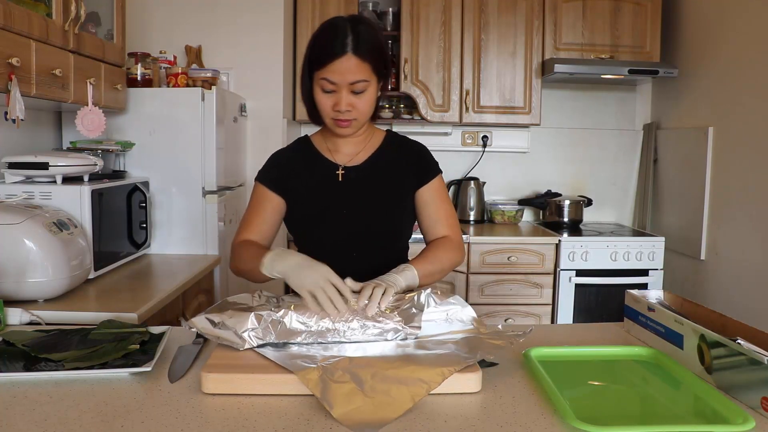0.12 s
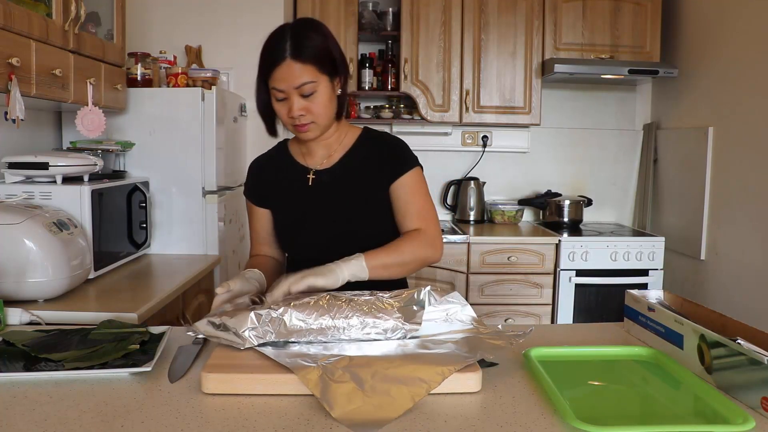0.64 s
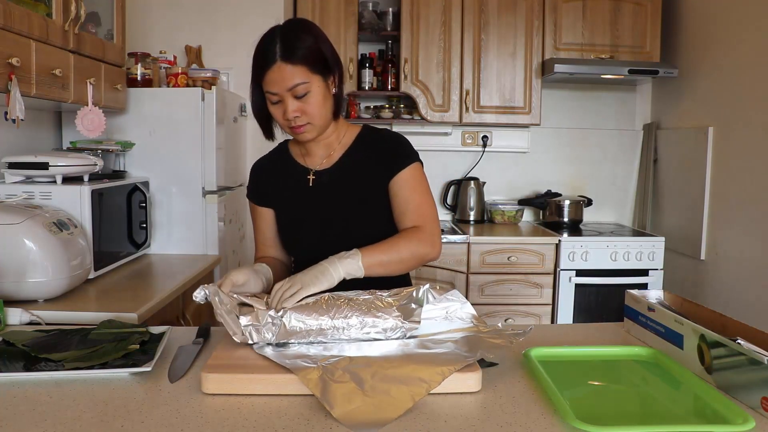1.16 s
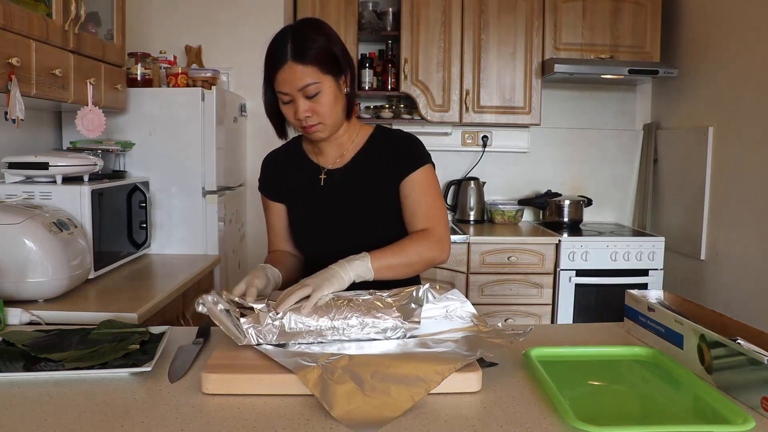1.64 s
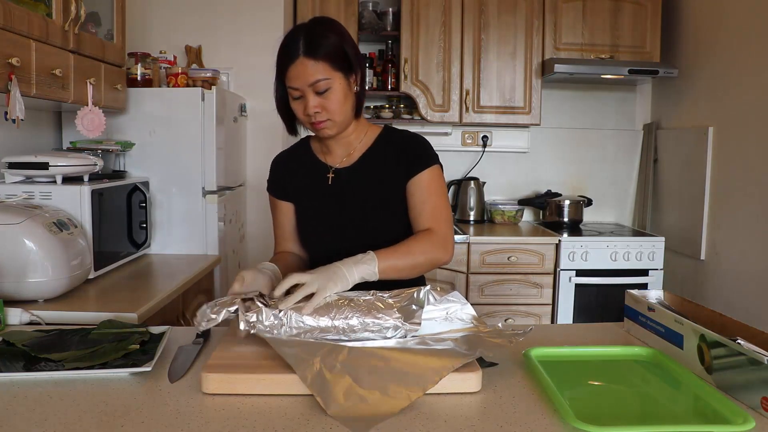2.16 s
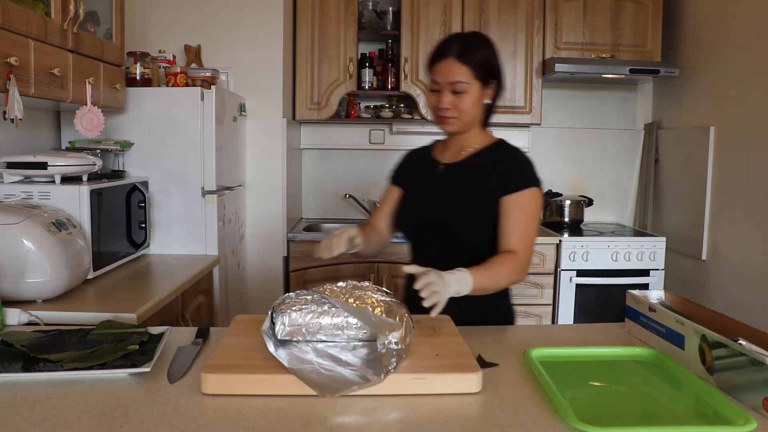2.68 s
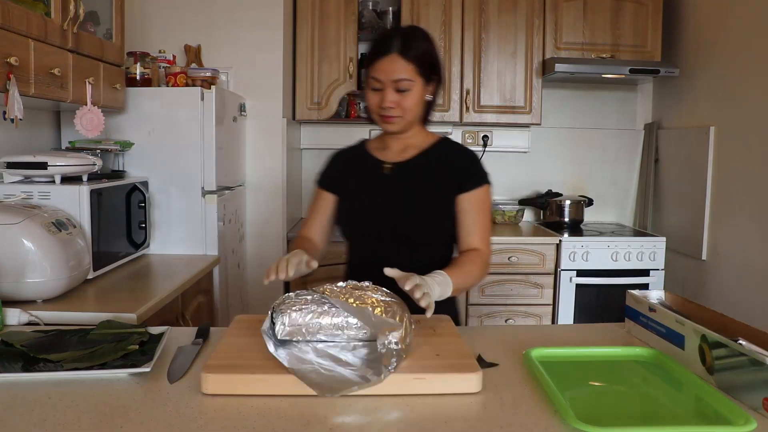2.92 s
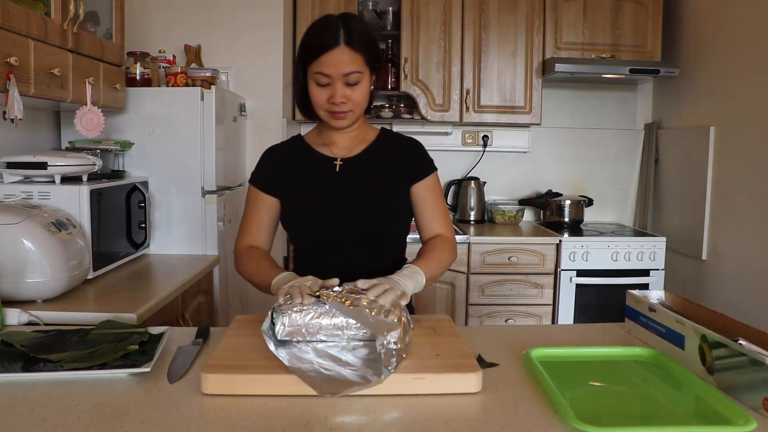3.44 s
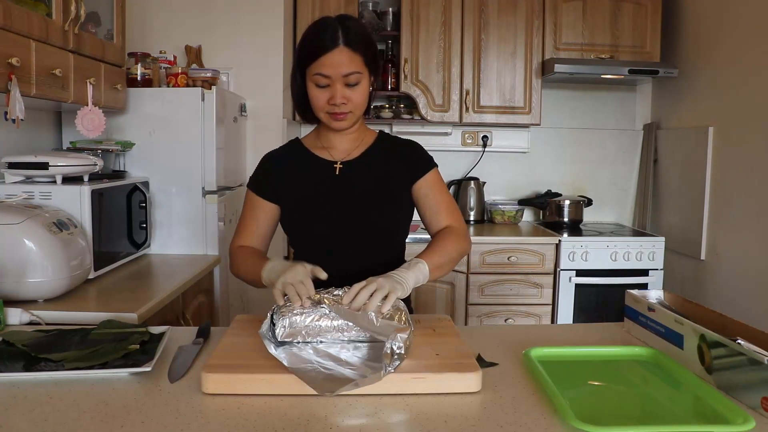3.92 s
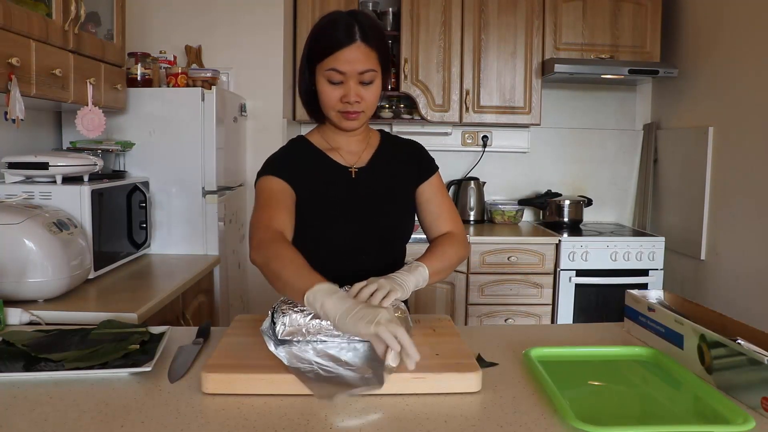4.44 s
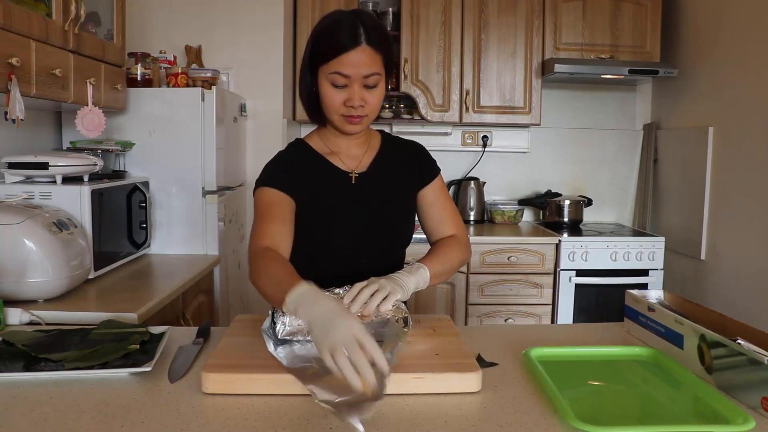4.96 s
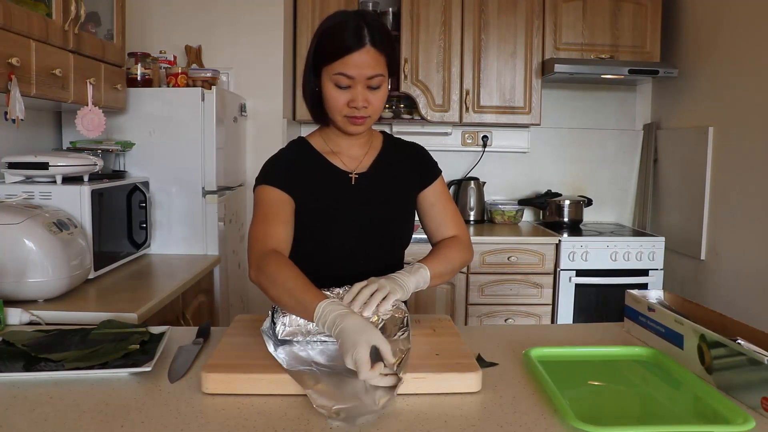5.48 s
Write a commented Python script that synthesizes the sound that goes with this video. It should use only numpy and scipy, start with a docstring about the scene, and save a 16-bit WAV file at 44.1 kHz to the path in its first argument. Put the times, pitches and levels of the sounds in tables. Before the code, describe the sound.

Dense, bright foil crinkling with crunches and sharp ticks, a brief near-quiet gap after an edit, then lighter rustles building to loud crackles.

```python
"""Foil in a hard kitchen

Gloved hands press and fold aluminium foil round a roll on a wooden board in a small hard kitchen.
Creases of four sizes buckle as dense grains of damped sines; stiff folds crunch, sharp ones tick, the board knocks.
The room smears them with decaying noise; a fridge hums over a low drone, hiss and rumble.
An edit joins two moments, cutting the first one's echo short; the second opens with a knock on wood."""
import sys
import numpy as np
from scipy import signal
from scipy.fft import rfft, irfft, next_fast_len
from scipy.io import wavfile
from scipy.ndimage import map_coordinates

SR = 44100
rng = np.random.default_rng(int(sys.argv[2]) if len(sys.argv) > 2 else 0)


def waveform_to_disk(signal):
    """Save audio, clipped to [-1, 1], as 16-bit WAV at the path in sys.argv[1]."""
    frames = np.transpose(np.atleast_2d(signal))
    scaled = np.clip(frames, -1, 1) * 32767
    samples = np.round(scaled).astype(np.int16)
    wavfile.write(sys.argv[1], SR, samples)


def amplitude_ratio(level_db):
    """Convert a level in decibels to the matching linear amplitude (field) ratio."""
    exponent = np.asarray(level_db, float) / 20
    return 10 ** exponent


N = 246502  # length in samples

# Crease sizes, fine to large. Each row: middle pitch in Hz, pitch spread in octaves,
# ring in cycles (it falls to 1/e in half of them), size scatter in dB.
CREASE_SIZES = [(8850, 0.39, 2.3, 2), (3645, 0.53, 1.63, 0), (1505, 0.46, 3.8, 1.5), (483, 0.58, 2.25, 3)]
# How often each crease size buckles. Each entry: pops a second.
CREASE_RATES = [5000, 3000, 1400, 450]
# Balance of the crease sizes. Each entry: level beside the fine creases in dB.
CREASE_BALANCE = [0, 0, -4.5, -11.5]
# Squeezes of the hands. Each row: start in seconds, rise in seconds, hold in seconds,
# level of the fine creases in dB, dB gained per step up in crease size.
SQUEEZES = [(0, 0.0067, 0.054, -27.5, -1), (0.075, 0.054, 0.027, -29, -3),
            (0.227, 0.046, 0.065, -34.5, -0.5), (0.395, 0.054, 0.042, -30, 0),
            (0.64, 0.041, 0.016, -24.5, 1.5), (0.742, 0.06, 0.087, -30.5, 1),
            (0.892, 0.062, 0.046, -28.5, 1), (0.993, 0.056, 0.046, -29, 2),
            (1.124, 0.045, 0.17, -33.5, 1.5), (1.22, 0.069, 0.018, -28, -0.5),
            (1.464, 0.019, 0.012, -29, 1.5), (1.5, 0.022, 0.09, -27, -0.5), (1.617, 0.057, 0.15, -30, 1),
            (1.772, 0.13, 0.1, -28, 1.5), (1.986, 0.055, 0.064, -25, -1.5),
            (2.132, 0.036, 0.079, -31.5, -1), (2.207, 0.06, 0.1, -29, 1.5), (2.352, 0.082, 0.023, -25, 1.5),
            (2.486, 0.026, 0.057, -31, 2), (2.728, 0.016, 0.014, -59, 12.5),
            (2.743, 0.056, 0.021, -50.5, 4), (2.88, 0.052, .12, -63, 3.5), (3.113, 0.082, 0.046, -32, 0.5),
            (3.276, 0.035, 0.064, -41.5, 1), (3.391, 0.031, 0.023, -39.5, 0.5),
            (3.48, 0.056, 0.096, -42.5, -0.5), (3.639, 0.073, 0.036, -38.5, 0),
            (3.732, 0.036, 0.036, -27.5, -1.5), (3.837, 0.038, 0.072, -34.5, -0.5),
            (3.958, 0.025, 0.074, -38, 1), (4.125, 0.033, 0.043, -51, -14),
            (4.241, 0.062, 0.032, -37.5, 0.5), (4.352, .04, 0.053, -43, 0.5),
            (4.434, 0.068, 0.017, -23, -1), (4.555, 0.033, .16, -29, 0.5), (4.746, 0.04, 0.043, -27.5, 1),
            (4.848, 0.051, 0.027, -24.5, -1), (4.945, 0.033, .05, -26.5, -3), (5.09, 0.02, 0.025, -38, -6),
            (5.229, .03, 0.05, -30.5, -0.5), (5.302, .1, 0.075, -28, -0.5),
            (5.485, 0.066, .03, -22.5, -3.5)]
# Crunches, where a stiff fold gives way. Each row: start in seconds, relative level in dB, pitch in Hz.
CRUNCHES = [(0.0166, -17, 3440), (0.4314, -6, 8900), (0.4694, -17, 3970), (0.6616, -7.5, 1530),
            (0.6883, -6.5, 1800), (0.8465, -1, 3200), (0.9764, -5, 2210), (1.0714, -6, 3220),
            (1.34, -8.5, 1220), (1.4872, -9, 6700), (1.5253, -0.5, 3810), (1.5392, -1.5, 1930),
            (1.91, -12, 1630), (2.0584, -8, 8970), (2.2844, -2, 3220), (2.451, -2.5, 6720),
            (3.1444, -16, 6520), (3.1924, -15, 3000), (3.234, -15, 4950), (3.4343, -10.5, 3600),
            (3.5351, -12.5, 6100), (3.6693, -12.5, 4050), (3.7852, -2, 5030), (3.985, -11, 1520),
            (4.0564, -12, 3280), (4.2954, -21, 3780), (4.4566, -1.5, 6050), (4.5087, -10, 7060),
            (4.585, -6, 7100), (4.7834, 2.5, 8250), (4.9125, -2.5, 3900), (5.248, -11.5, 3630),
            (5.4384, -10, 8700), (5.578, -8, 3390)]
# The loudest single dry ticks. Each row: start in seconds, relative level in dB.
LOUD_TICKS = [(0.442, -10), (0.7, -4.5), (0.7062, -11), (0.9575, -3), (1.083, 0), (1.487, -5),
              (1.5285, -7.5), (1.697, -4), (1.912, -7), (2.1, -13), (2.9526, -31), (3.536, -18),
              (3.789, -13), (3.896, -7), (3.986, -18), (4.2547, -19), (4.432, -15), (4.5425, -14),
              (4.786, -0.5), (4.7977, -2), (4.918, -10), (5.032, -5), (5.2093, -32), (5.2933, -16),
              (5.5314, -12)]
# Dull knocks through the board. Each row: start in seconds, relative level in dB.
BOARD_KNOCKS = [(0.687, -32), (1.053, -31), (1.332, -25), (1.47, -20), (1.541, -18.5), (1.882, -20.5),
                (1.933, -17.5), (1.988, -19.5), (2.029, -19.5), (2.436, -25), (2.737, -26.5),
                (2.746, -22.5), (2.756, -25), (2.763, -32), (3.982, -29.5), (4.486, -24.5), (4.801, -30),
                (5.391, -28), (5.531, -29)]
# Ringing modes of the wooden board. Each row: pitch in Hz, relative level in dB, time to fall 60 dB in seconds.
BOARD_MODES = [(144, -12, 0.04), (203, -12, 0.057), (277, -6.5, 0.04), (374, -15, 0.018), (470, 5.5, 0.031),
               (605, 7.5, 0.028)]
# Low drone from outdoors that swells and rises. Each row: time in seconds, level in dB rms, pitch in Hz.
DRONE_PATH = [(0, -70, 52.2), (3.4, -68, 51.7), (3.8, -62, 53.2), (4.2, -57.5, 56), (4.5, -59, 59.7),
              (5.0, -59, 62.5), (5.59, -70, 61.3)]
# Spectrum of the kitchen's hiss and rumble. Each row: frequency in Hz, relative level in dB per Hz.
AIR_SPECTRUM = [(20, -11), (40, -5), (70, -4.5), (100, -0.5), (490, -1.5), (870, -8.5), (1100, -6.5),
                (2000, -10), (4000, -19), (8000, -56), (12000, -56), (15800, -34)]
# Echo length of the kitchen. Each row: frequency in Hz, time to fall 60 dB in seconds.
ECHO_TIMES = [(150, 0.67), (800, 0.67), (3000, 1), (8000, 0.39), (15000, 0.22)]
# Likeness of left and right in diffuse sound. Each row: frequency in Hz, correlation from -1 to 1.
LIKENESS = [(40, 0.53), (100, 0.096), (300, 0.55), (800, 0.26), (2000, 0.022), (5000, 0.023)]
# How early the left port hears one end, the middle and the other end of the sheet. Each entry: seconds.
SPOT_LEADS = [1.2e-5, 4.4e-5, 8e-5]
# Microphone colour. Each row: frequency in Hz, gain in dB.
MIC_COLOUR = [(60, 0.5), (200, -4.5), (500, -3.5), (900, -4), (2200, -0.54), (3500, 3.5), (6000, 5.5),
              (9000, 6), (12000, 4.5), (15800, 3)]
# Stereo balance. Each row: frequency in Hz, left over right in dB.
LEFT_OVER_RIGHT = [(100, 1), (500, 2), (2000, 0.8), (5000, 0), (9000, 2.5), (15000, 3.5)]

LARGEST_RELEASE_S, RELEASE_BEND = 0.158, 1.52  # letting go of the largest creases; the fall eases off
FINE_STOPS_SOONER_S = 0.012  # each smaller crease size falls silent this much earlier
CLUMP_DB, DRIFT_DB = 1.54, 1.03  # wavering of all sizes together, and of each size alone
STRAY_TICKS, STRAY_DB = 60, 18  # lesser ticks at chance moments, and their level over the fine rustle
FRIDGE_HZ, FRIDGE_DB, AIR_DB = 40.2, -60, -51  # levels in dB rms ahead of the microphone colour
SHEET_HZ = 160  # the small thin sheet sends out little below this
EDIT_S, FADE_S, RESUME_S = 2.601, 0.009, 2.62  # first moment ends, its fade, second moment starts
LEFT_RIGHT = np.array([[1], [-1]])


def unit(x):
    """Scales sound to an rms of 1."""
    return x / np.sqrt(np.mean(x ** 2) + 1e-20)


def along(points, hz):
    """Reads a curve of (Hz, value) points on a log frequency axis."""
    f, v = np.transpose(points)
    return np.interp(np.log(hz + 1), np.log(f + 1), v)


def filtered(x, response):
    """Shapes a sound by a complex response of frequency."""
    m = next_fast_len(N + 8192)
    hz = np.fft.rfftfreq(m, 1 / SR)
    return irfft(rfft(x, m) * response(hz), m)[..., :N]


def wobble(rate):
    """A smooth random curve with the given number of knots a second."""
    knots = rng.standard_normal(int(N * 60 / SR) + 4)
    return map_coordinates(knots, [np.arange(N) * rate / SR])


def rings(s, hz, cycles, gain, size):
    """Pops as damped sines, falling to 1/e in the given cycles, each at a random spot along the sheet."""
    turns = np.arange(size) / SR * np.clip(hz, 60, SR * 0.45)[:, None]
    wave = gain[:, None] * np.sin(2 * np.pi * turns) * np.exp(-turns / cycles)
    spots, room = len(SPOT_LEADS), N + SR  # spare second for the last rings
    spot = rng.integers(spots, size=len(s))
    at = (spot * room + (s * SR).astype(int))[:, None] + np.arange(size)
    return np.bincount(at.ravel(), wave.ravel(), spots * room).reshape(spots, -1)[:, :N]


def effort_db(step):
    """Level of one crease size: squeezes swell, hold and let go, each with its own balance of sizes."""
    t = np.arange(0, N, 32) / SR
    power = 1e-10
    release = LARGEST_RELEASE_S - FINE_STOPS_SOONER_S * (len(CREASE_SIZES) - 1 - step)
    for s, rise, hold, db, coarse_db in SQUEEZES:
        swell = np.clip((t - s) / max(rise, 1e-3), 0, 1) ** 2
        letting_go = np.clip(1 - (t - s - rise - hold) / release, 0, 1) ** RELEASE_BEND
        same_moment = (t < RESUME_S) == (s < RESUME_S)  # no squeeze crosses the edit
        power = power + (swell * letting_go * amplitude_ratio(db + step * coarse_db) * same_moment) ** 2
    return np.interp(np.arange(N) / SR, t, 10 * np.log10(power)) + CREASE_BALANCE[step]


def crinkle():
    """Each crease pops from one bent state to the other; small creases ring high and come often."""
    clump_db = CLUMP_DB * wobble(40)  # one buckle sets off its neighbours
    sound = 0
    for step, ((hz, octaves, cycles, scatter_db), rate) in enumerate(zip(CREASE_SIZES, CREASE_RATES)):
        count = int(rate * N / SR)
        start = rng.random(count) * N / SR
        pitch = hz * 2 ** (octaves * rng.standard_normal(count))
        sizes = np.minimum(rng.exponential(size=count), 3)  # no crease outgrows the sheet's stiffness
        gain = amplitude_ratio(scatter_db * sizes) * rng.choice([-1, 1], size=count)
        pops = rings(start, pitch, cycles / 2, gain, size=int(3e5 / rate))
        level_db = effort_db(step) + clump_db + DRIFT_DB * wobble(15)
        sound = sound + unit(pops) * amplitude_ratio(level_db)
    return sound / np.sqrt(len(SPOT_LEADS))


def background():
    """Two low tones, the fridge slightly unsteady, over the filtered noise of the room's hiss and rumble."""
    t = np.arange(N) / SR
    s, drone_db, drone_hz = np.transpose(DRONE_PATH)
    # standing waves shift the phase between the ports
    fridge_phase = 2 * np.pi * FRIDGE_HZ * t + 0.6 * wobble(2.4) + 0.43 * LEFT_RIGHT
    fridge = amplitude_ratio(FRIDGE_DB) * np.sin(fridge_phase)
    drone_phase = 2 * np.pi * np.cumsum(np.interp(t, s, drone_hz)) / SR + 0.35 * LEFT_RIGHT
    drone = amplitude_ratio(np.interp(t, s, drone_db)) * np.sin(drone_phase)
    air = filtered(rng.standard_normal((2, N)), lambda hz: amplitude_ratio(along(AIR_SPECTRUM, hz)))
    return np.sqrt(2) * (fridge + drone) + amplitude_ratio(AIR_DB) * unit(diffuse(air))  # sqrt(2): sine peak over rms


def snaps():
    """A stiff fold gives way: a quick run of many pops round one pitch that thins out."""
    s, db, hz = np.repeat(CRUNCHES, 40, axis=0).T  # 40 pops a crunch
    late, bend, sway = rng.standard_normal((len(s), 3)).T
    start = s + 0.012 * abs(late)
    pitch = hz * 2 ** (0.8 * bend)
    gain = amplitude_ratio(db - 16 + 2 * sway) * np.sign(bend)
    return rings(start, pitch, 1.1, gain, size=100)


def ticks():
    """One sharp crease flips at once: a pop that dies within a cycle; lesser ones follow the rustle."""
    at = rng.integers(N, size=STRAY_TICKS)
    s, db = np.transpose(LOUD_TICKS)
    s = np.append(s, at / SR)
    db = np.append(db, effort_db(0)[at] + STRAY_DB)
    bend, flip = rng.standard_normal((len(s), 2)).T
    gain = amplitude_ratio(db + 5.5) * np.sign(flip)  # so damped a sine peaks well below its gain
    return rings(s, 5500 * 2 ** (0.45 * bend), 0.23, gain, size=60)


def knocks():
    """Soft blows ring the wooden board's modes at new strengths each time, under the middle of the sheet."""
    sound = np.zeros((len(SPOT_LEADS), N + SR))
    t = np.arange(SR // 8) / SR
    soft_onset = 1 - np.exp(-(t / 0.0024) ** 2)
    for s, db in BOARD_KNOCKS:
        ring = 0
        for hz, level, t60 in BOARD_MODES:
            mode_db = level + 2 * rng.standard_normal() - 60 * t / t60
            ring = ring + amplitude_ratio(mode_db) * np.cos(2 * np.pi * hz * (t - 0.003))
        sound[1, round(s * SR):][:len(t)] -= amplitude_ratio(db - 5.0) * ring * soft_onset
    return sound[:, :N]


def diffuse(pair):
    """Mixes two unrelated signals into the left and right of a diffuse field, alike by frequency."""
    def mid_side(hz):
        turn = np.arccos(np.clip(along(LIKENESS, hz), -1, 1)) / 2
        return np.array([np.cos(turn), np.sin(turn)])
    mid, side = filtered(pair, mid_side)
    return np.array([mid + side, mid - side])


def kitchen(x):
    """Diffuse echo of decaying noise: each frequency dies at its own speed, each short stretch has its own tail."""
    wet = np.zeros((2, N + SR))
    step, delay = SR // 16, 130  # samples
    for at in range(0, N, step):
        hz, t, z = signal.stft(rng.standard_normal((2, SR // 2)), SR, nperseg=256)
        fall = amplitude_ratio(-60 * t / along(ECHO_TIMES, hz)[:, None])
        even_fall = fall / np.linalg.norm(fall, axis=1)[:, None]  # equal energy at every frequency
        tail = signal.istft(z * even_fall, SR, nperseg=256)[1]
        echo = signal.fftconvolve(x[None, at:at + step], tail / np.linalg.norm(tail[0]), axes=1)
        wet[:, at + delay:at + delay + echo.shape[1]] += echo
    return diffuse(wet[:, :N])


def heard(spots):
    """Direct sound reaches the left port a little early, by the spot it comes from; the room adds its echo."""
    direct = 0
    for x, lead in zip(spots, SPOT_LEADS):
        direct = direct + filtered(x, lambda hz: np.exp(1j * np.pi * hz * lead * LEFT_RIGHT))
    return amplitude_ratio(-3.0) * direct + amplitude_ratio(-4.0) * kitchen(spots.sum(axis=0))


def scene():
    """Two moments of foil work over one background; the edit fades the first out together with its echo."""
    t = np.arange(N) / SR
    crinkling, room_tone = crinkle(), background()
    foil = crinkling + snaps() + ticks()
    foil = filtered(foil, lambda hz: (1j * hz / (SHEET_HZ + 1j * hz)) ** 2)  # gentle low cut
    work = foil + knocks()
    before = np.clip((EDIT_S - t) / FADE_S, 0, 1)
    first = before * heard(work * (before > 0))
    second = heard(work * (t > RESUME_S))
    return first + second + room_tone


def band_limit(x):
    """A steep low-pass at the top of the band."""
    return signal.sosfilt(signal.butter(12, 15870, fs=SR, output="sos"), x)


def record(dry):
    """The microphone colours the sound and tilts it between left and right, by frequency."""
    def colour(hz):
        balance_db = along(LEFT_OVER_RIGHT, hz) / 2 * LEFT_RIGHT
        return amplitude_ratio(along(MIC_COLOUR, hz) + balance_db)
    mix = filtered(dry, colour)
    return band_limit(mix)


dry = scene()
out = record(dry)
waveform_to_disk(out)
```